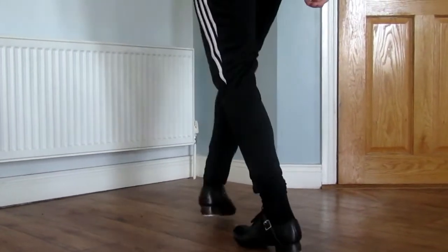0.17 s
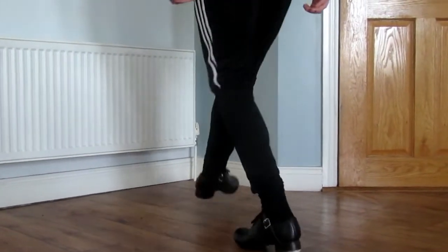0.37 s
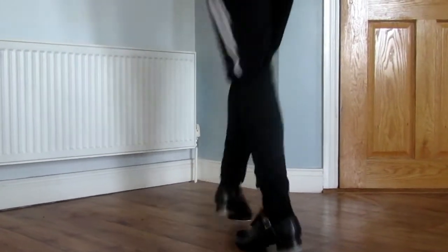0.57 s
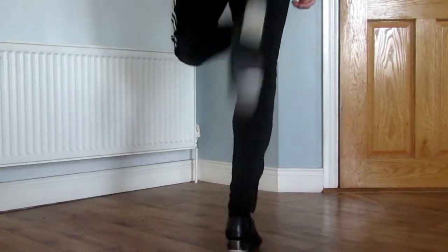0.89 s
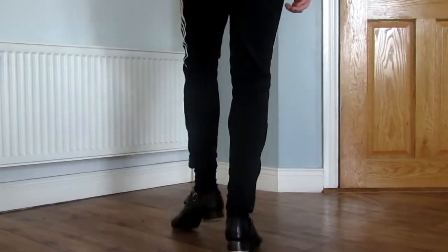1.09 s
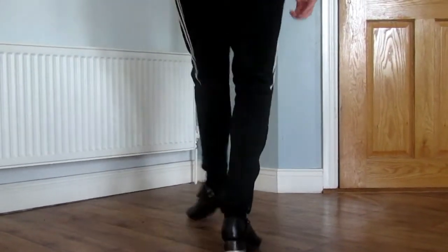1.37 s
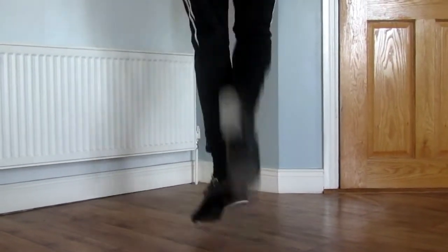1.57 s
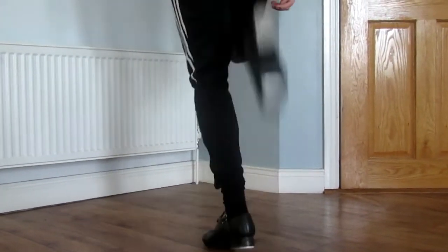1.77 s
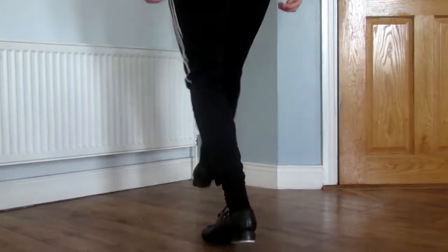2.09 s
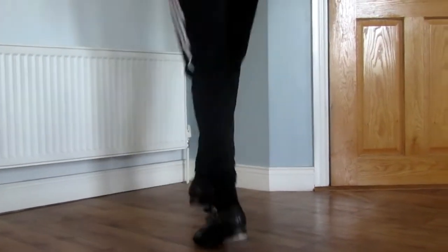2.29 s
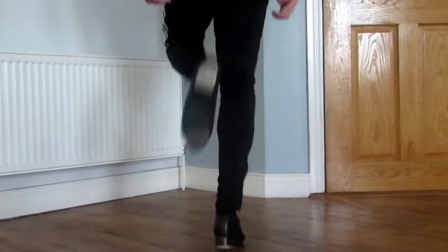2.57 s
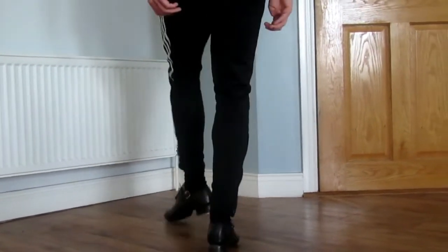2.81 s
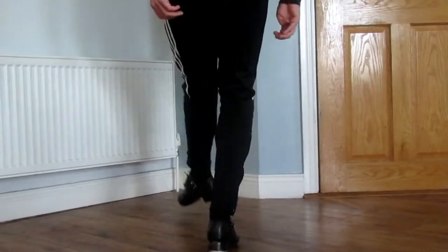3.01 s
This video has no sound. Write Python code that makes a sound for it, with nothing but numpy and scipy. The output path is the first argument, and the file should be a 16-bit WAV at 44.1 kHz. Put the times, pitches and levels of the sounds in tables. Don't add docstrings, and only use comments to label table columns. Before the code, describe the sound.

Tap shoes knock and crack steadily on wooden boards in a small, bare, echoing room.

```python
import sys
import numpy as np
from scipy import signal
from scipy.fft import rfft, irfft
from scipy.io import wavfile

SR = 44100
rng = np.random.default_rng(int(sys.argv[2]) if len(sys.argv) > 2 else 0)


def output_pcm(signal):
    pcm = np.clip(np.atleast_2d(signal).T, -1, 1) * 32767
    wavfile.write(sys.argv[1], SR, np.round(pcm).astype(np.int16))


def boost_factor(decibels):
    exponent = np.asarray(decibels, float) / 20
    return 10 ** exponent


N = 141120
LEAD = SR // 5
TAIL_RISE_S = 0.0011


def at_hz(points, hz):
    curve_hz, values = np.array(points).T
    return np.interp(np.log(hz), np.log(curve_hz), values)


def butter(x, hz, kind, order=2):
    return signal.sosfilt(signal.butter(order, hz, kind, fs=SR, output="sos"), x)


def ring(hz, t60_s, size):
    t = np.arange(size) / SR
    return -np.sin(2 * np.pi * hz * t) * boost_factor(-60 * t / t60_s)


def add(track, start_s, sound):
    i = int(start_s * SR) + LEAD
    track[i:i + len(sound)] += sound[:len(track) - i]


def crack(top_hz, size):
    click = butter(signal.unit_impulse(size), 3460, "high", order=3)
    return -butter(click, top_hz, "low")


def snap(hz, cycles, size):
    rebound = 0.55
    inward = np.arange(size) < SR / hz / 2
    swing = ring(hz, cycles / hz, size) * np.where(inward, 1, rebound)
    return butter(butter(swing, min(5.1 * hz, 18000), "low"), 350, "high", order=1)


# pitch_hz, t60_s
TAIL_T60 = [(60, 0.43), (160, 0.39), (420, .62), (1100, 0.62), (2900, .55), (6000, 0.6), (10000, 0.49),
            (15000, .35)]
# pitch_hz, level_db
TAIL_COLOUR = [(60, -20), (200, -4.5), (500, -0.5), (1200, -4.5), (2500, 6), (5000, -8), (9000, -7),
               (15000, -7)]


def room(size):
    direct_db, tail_db, echo_db, echo_loss_db_per_s = -2, -18.5, 0.5, 250
    first_echo_s, echo_cut_hz = 0.001, 2500
    t = np.arange(size) / SR
    edges_hz = 50 * 2 ** np.arange(0, 9, 0.5)
    white = rng.standard_normal((2, size))
    tail = np.zeros(size)
    for k, (low_hz, high_hz) in enumerate(zip(edges_hz, edges_hz[1:])):
        hz = np.sqrt(low_hz * high_hz)
        fade_db = at_hz(TAIL_COLOUR, hz) - 60 * t / at_hz(TAIL_T60, hz)
        tail += butter(white[k % 2], [low_hz, high_hz], "band") * boost_factor(fade_db)
    tail *= boost_factor(tail_db) * (1 - np.exp(-np.maximum(t - first_echo_s, 0) / TAIL_RISE_S))
    tail[0] += boost_factor(direct_db)

    lag_s = first_echo_s + np.cumsum(rng.uniform(0.0005, 0.004, 8))
    slaps = np.zeros(size)
    slaps[(lag_s * SR).astype(int)] = boost_factor(echo_db - echo_loss_db_per_s * lag_s) * rng.uniform(0.36, 1, 8)
    return tail + butter(slaps + 1e-18, echo_cut_hz, "low")


# pitch_hz, level_db, t60_s
ROOM_MODES = [(107.4, -12.5, 0.26), (140.4, -0.5, .4), (183.5, 2, 0.32), (216.3, -3, 0.7),
              (258.5, -20.5, 0.13), (284.7, -3.5, 0.4), (329.3, -1, 0.43), (381, 0.5, 0.58),
              (424, -1, 0.44), (489, -7, 0.57)]


def wake_modes(track, start_s, thump_level_db):
    size = 36000
    swell = 1 - np.exp(-np.arange(size) / SR / TAIL_RISE_S)
    draws = rng.standard_normal((len(ROOM_MODES), 2))
    for (hz, db, t60_s), (chance, lag) in zip(ROOM_MODES, draws):
        level_db = thump_level_db - 19 + db + 2 * np.clip(chance, -2, 1)
        add(track, start_s + abs(lag) / hz / 2, swell * boost_factor(level_db) * ring(hz, t60_s, size))


BEATS_S = [-.07, .2168, .4625, .7697, 1.096, 1.378, 1.6319, 1.9333, 2.2256, 2.4838, 2.7883]
KNOCK_RING_S = [0.0028, 0.0028, 0.0025, 0.0037, .003, 0.0031, 0.0018, 0.0048, 0.0025, .004, 0.0016]
# knock_level_db, knock_pitch_hz, thump_level_db, thump_pitch_hz, crack_level_db
BLOWS = [(-15, 1160, -24, 316, -12), (-6, 920, -10.5, 232, -33), (-8.5, 1060, -16.5, 97, -18.5),
         (-9.5, 1370, -15, 284, -18.5), (-12, 744, -13.5, 340, -13), (-4, 863, -14, 248, -12),
         (-6, 1140, -13.5, 306, -20), (-12.5, 1214, -19.5, 360, -17.5), (-10.5, 1050, -20, 140, -20.5),
         (-11.5, 1434, -15, 284, -24.5), (-5.5, 1180, -16.5, 430, -17)]
# peak_level_db, pitch_hz, ring_cycles, crack_top_hz
SNAPS = [(-40, 1000, 4.0, 2700), (-6.5, 1470, 2, 12000), (-8.5, 1400, 3.8, 5550), (-4.5, 1800, 5.8, 7900),
         (-11, 1300, 4.4, 5700), (-3.5, 760, 2.2, 7250), (2, 2350, 4, 6200), (-13.5, 1500, 6.4, 8500),
         (-12, 2050, 6.2, 5600), (-1.5, 2000, 6.3, 7900), (0.5, 3170, 2.6, 7700)]


def blows():
    knock_gain_db, thump_gain_db, crack_gain_db, snap_gain_db = 2, 7, 18.5, 6.5
    thump_t60_s, board_top_hz = 0.0073, 2610
    size = 2048
    out = np.zeros(N + LEAD)
    for start_s, knock_t60_s, body, first_contact in zip(BEATS_S, KNOCK_RING_S, BLOWS, SNAPS):
        knock_db, knock_hz, thump_db, thump_hz, crack_db = body
        snap_db, snap_hz, cycles, crack_hz = first_contact
        thump = boost_factor(thump_db + thump_gain_db) * ring(thump_hz, thump_t60_s, size)
        knock = boost_factor(knock_db + knock_gain_db) * ring(knock_hz, knock_t60_s, size)
        board = butter(thump + knock, board_top_hz, "low", order=4)
        contact = board + boost_factor(crack_db + crack_gain_db) * crack(crack_hz, size)
        add(out, start_s, signal.fftconvolve(contact, room(36000)))
        add(out, start_s, boost_factor(snap_db + snap_gain_db) * snap(snap_hz, cycles, size))
        wake_modes(out, start_s, thump_db + thump_gain_db)
    return out


# pitch_hz, level_db (per Hz)
HUSH = [(25, -17), (45, 1), (65, -17), (110, -3), (1500, -14.5), (5000, -21.5), (10000, -37), (15000, -45)]


def hush():
    hush_db, whine_db, whine_hz = -53, -82.5, 11800
    hz = np.maximum(np.fft.rfftfreq(N, 1 / SR), 1)
    air = irfft(rfft(rng.standard_normal(N)) * boost_factor(at_hz(HUSH, hz)), N)
    whine = np.sin(2 * np.pi * whine_hz * np.arange(N) / SR)
    return boost_factor(hush_db) * air / air.std() + boost_factor(whine_db) * whine


# start_s, peak_level_db, pitch_hz
TICKS = [(0.225, -22, 6000), (.566, -39, 11000), (0.608, -41.5, 10000), (.754, -31.5, 5500),
         (0.762, -36.5, 10020), (1.06, -38.5, 6020), (1.294, -28.5, 6930), (1.301, -28, 10000),
         (1.31, -41, 10000), (1.387, -22, 6360), (1.6442, -27.5, 8000), (1.6503, -32.5, 4500),
         (1.818, -31.5, 6000), (2.18, -34, 11900), (2.2, -32, 7000), (2.21, -25, 8550), (2.23, -29, 11870),
         (2.236, -28.5, 9000), (2.249, -32.5, 11000), (2.391, -31.5, 8020), (2.399, -42, 9030),
         (2.41, -29, 5980), (2.422, -27.5, 10100), (2.428, -30, 8510), (2.497, -29, 4200),
         (2.72, -43.5, 9000), (3.0, -41, 5000)]


def ticks():
    out = np.zeros(N + LEAD)
    for start_s, db, hz in TICKS:
        add(out, start_s, boost_factor(db + 6.5) * ring(hz, 6.8 / hz, 512))
    return out


# start_s, length_s, level_db
SCUFFS = [(0.256, 0.046, -52), (0.569, 0.13, -47.5), (1.051, 0.12, -42.5), (1.291, .05, -43.5),
          (1.809, 0.052, -41.5), (2.171, .05, -51), (2.339, 0.053, -43.5), (2.384, .07, -40.5),
          (2.96, .05, -71)]


def scuffs():
    grains_per_s, low_hz, high_hz = 1600, 3840, 13000
    t = np.arange(N) / SR
    drag = np.zeros(N)
    for start_s, length_s, db in SCUFFS:
        drag += boost_factor(db) * np.sin(np.pi * np.clip((t - start_s) / length_s, 0, 1))
    strength = boost_factor(1.41 * np.minimum(rng.exponential(1, N), 4))
    grains = (rng.random(N) < grains_per_s / SR) * strength * rng.choice([-1, 1], N)
    out = np.zeros(N + LEAD)
    add(out, 0, 2.45 * drag * butter(grains, [low_hz, high_hz], "band"))
    return out


# start_s, level_db
JINGLES = [(.28, -46), (.288, -36), (.298, -41), (.318, -50), (0.329, -57)]
# pitch_hz, level_db
BUCKLE = [
    (11000, 2.5),
    (13900, -10.5),
    (12500, -4.5),
]


def jingles():
    out = np.zeros(N + LEAD)
    for start_s, db in JINGLES:
        for hz, level_db in BUCKLE:
            add(out, start_s, boost_factor(db + level_db) * ring(hz, 0.003, 2048))
    return out


# start_s, level_db, pitch_hz
LANDINGS = [(.645, -23, 300), (0.67, -24.5, 250), (1.429, -25, 100), (1.521, -21, 200), (1.68, -31, 70),
            (2.058, -31.5, 370), (2.29, -23, 150), (2.38, -28, 140), (2.54, -33, 102.7), (2.9, -34, 401)]


def landings():
    out = np.zeros(N + LEAD)
    for start_s, db, hz in LANDINGS:
        add(out, start_s, boost_factor(db) * ring(hz, 5 / hz, 8192))
    return out


def shuffles():
    thin = ticks() + scuffs() + jingles()
    in_room = signal.fftconvolve(landings() + thin, room(30000))[:N + LEAD]
    return boost_factor(2.5) * thin + in_room


def scene():
    feet = butter(blows() + shuffles(), 113, "high", order=3)
    feet = butter(feet, 11000, "low", order=1)
    return (feet[LEAD:] + hush())[None]


def roll_off(x):
    return signal.sosfilt(signal.butter(12, 16330, fs=SR, output="sos"), x)


def record(dry):
    notch_hz, notch_width_hz, notch_share = 7960, 190, 0.8
    ceiling, cutoff_hz, stop_s = 1.15, 15500, 3.0038
    b, a = signal.iirpeak(notch_hz, notch_hz / notch_width_hz, fs=SR)
    dipped = dry - notch_share * signal.lfilter(b, a, dry)
    rounded = ceiling * np.tanh(dipped / ceiling)
    mix = signal.sosfilt(signal.cheby2(10, 40, cutoff_hz, fs=SR, output="sos"), rounded)
    mix = mix * (np.arange(N) < stop_s * SR)
    return roll_off(mix)


dry = scene()
out = record(dry)
output_pcm(out)
```